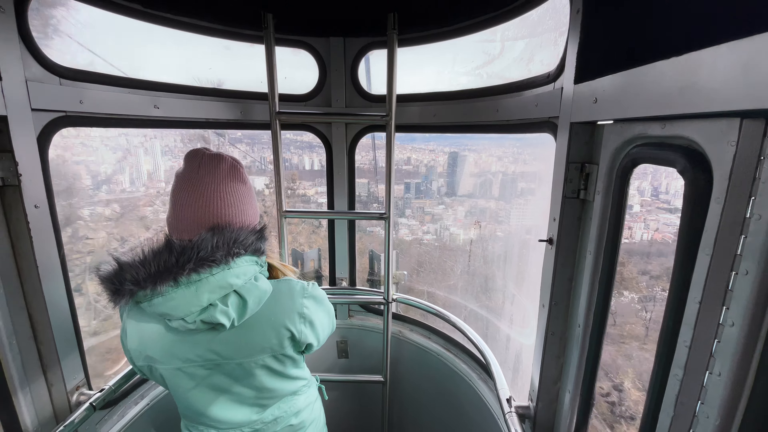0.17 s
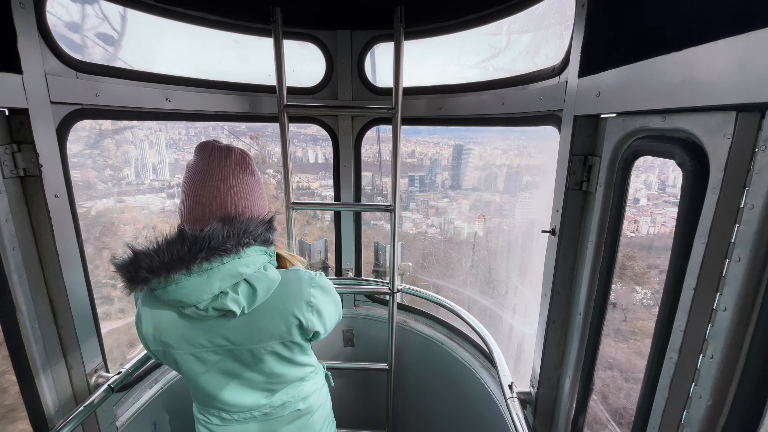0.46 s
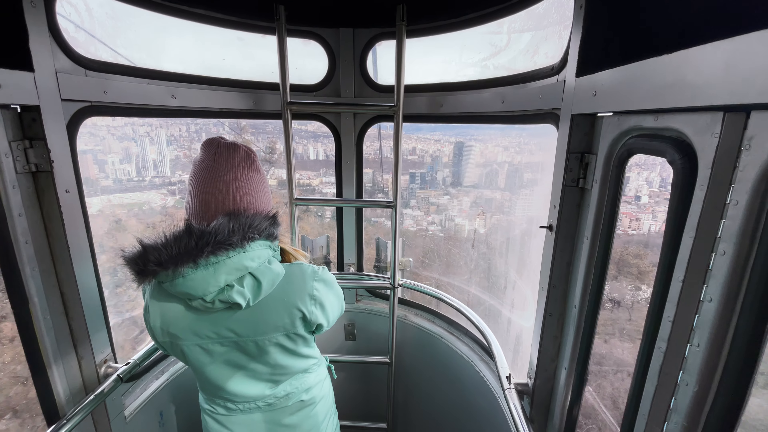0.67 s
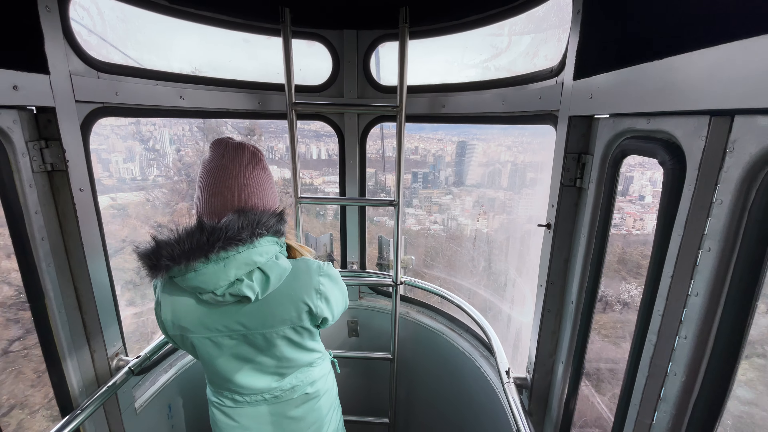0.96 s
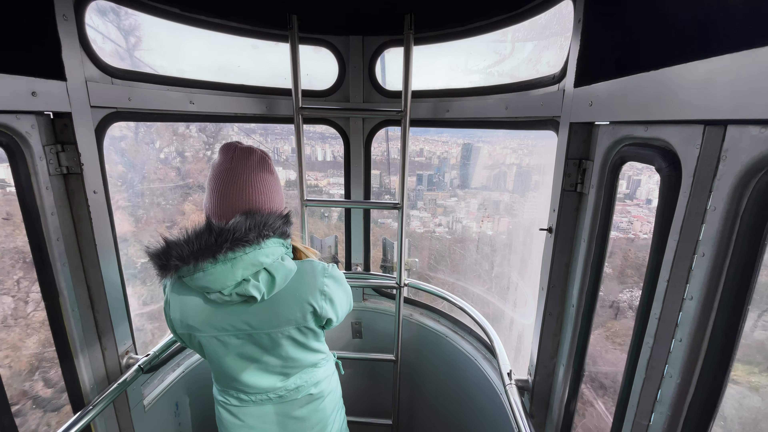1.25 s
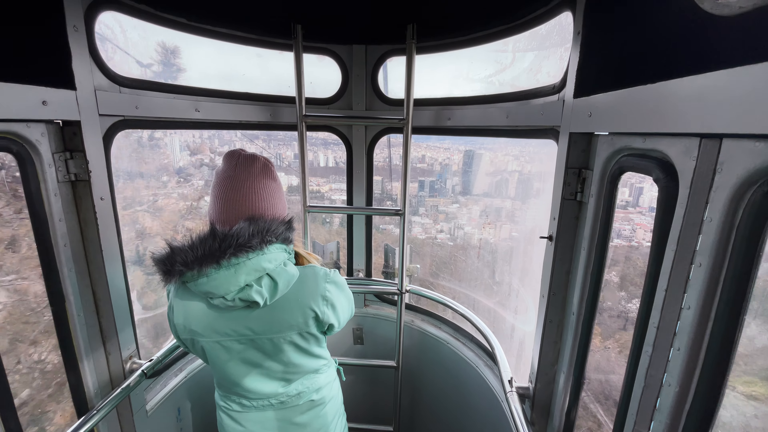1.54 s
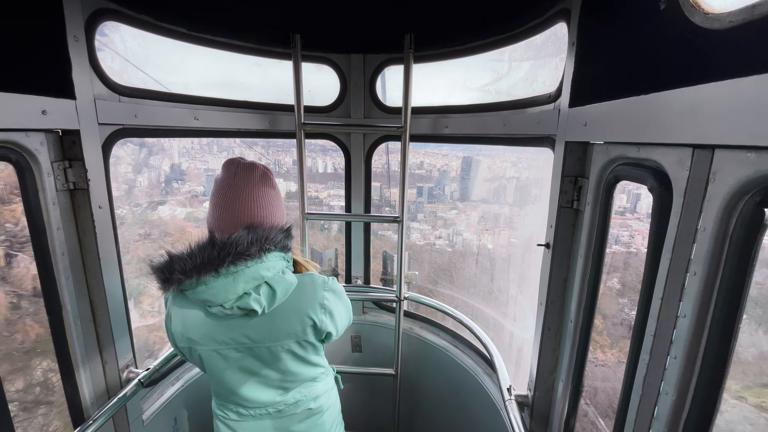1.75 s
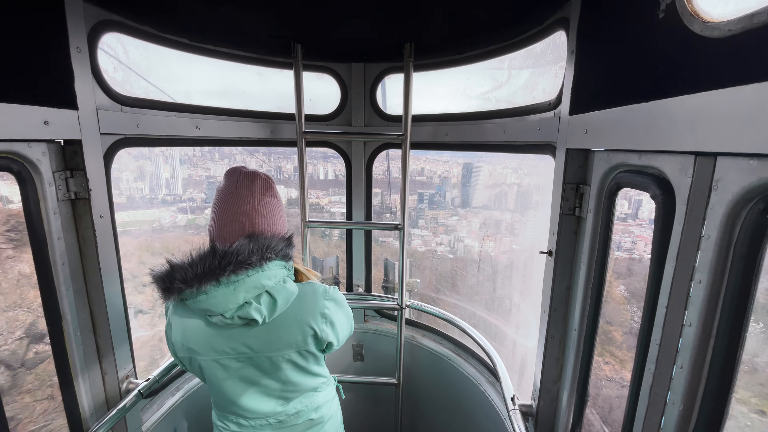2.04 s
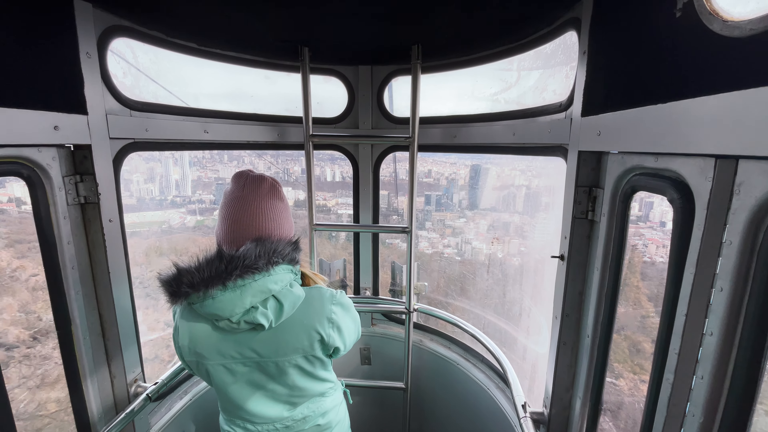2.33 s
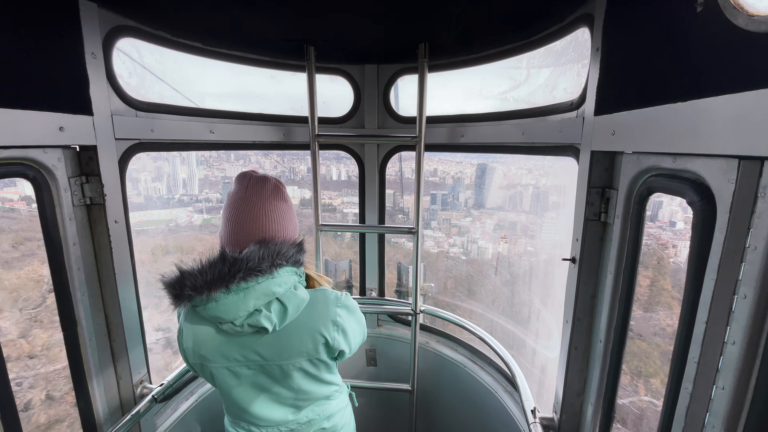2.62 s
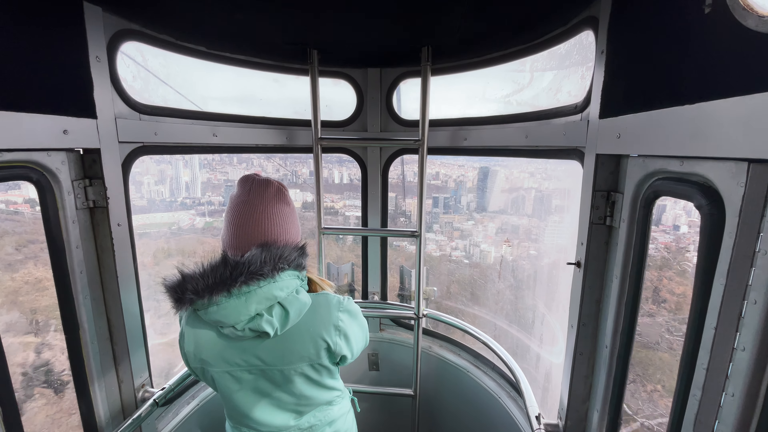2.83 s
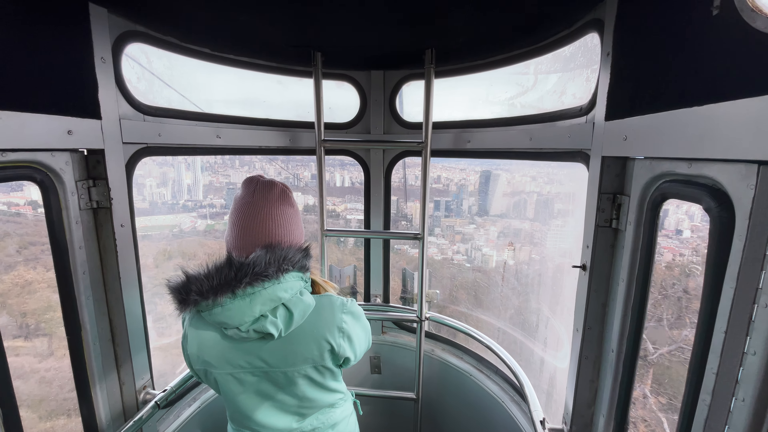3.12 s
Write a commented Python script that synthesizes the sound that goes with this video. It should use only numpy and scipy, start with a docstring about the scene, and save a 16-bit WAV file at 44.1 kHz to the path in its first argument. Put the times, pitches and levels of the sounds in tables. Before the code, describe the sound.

A low rumble swells and sinks throughout inside a small metal cable car as it travels along its rope. Light bumps shake the frame now and then, with faint rattling, rubbing and tiny pings over a soft wind.

```python
"""Inside a small metal cable car cabin gliding along its rope.
The shell booms near 80 Hz, the rope shakes the panels into a drone, and wind hisses past the windows.
Soft knocks come through the hanger (the arm that holds the cabin) and make the frame ring and shudder.
Loose frames rattle and parts rub; these sounds and the knocks echo briefly in the cabin.
A small fitting pings now and then."""
import sys
import numpy as np
from scipy import signal
from scipy.fft import rfft, irfft, next_fast_len
from scipy.io import wavfile
from scipy.ndimage import uniform_filter1d

SR = 44100
rng = np.random.default_rng(int(sys.argv[2]) if len(sys.argv) > 2 else 0)


def unload_audio(sound):
    """Save the sound as a 16-bit wav file, at the path given as the first command line argument."""
    columns = np.transpose(np.atleast_2d(sound))
    # keep every value between -1 and 1, then stretch to whole-number steps
    steps = np.round(np.clip(columns, -1, 1) * 32767)
    wavfile.write(sys.argv[1], SR, steps.astype(np.int16))


N = 145089

# soft knocks through the hanger: (time [s], level [dB], brightness [dB])
HANGER_KNOCKS = [(0.111, -41.5, -20), (0.194, -46.5, -3.5), (0.270, -54, -21.5), (0.341, -43.5, -27.5),
                 (0.515, -51.5, -13), (0.759, -37, -18), (0.951, -40.5, -14.5), (1.079, -36, -13),
                 (1.201, -45, -22.5), (1.363, -31.5, -14.5), (1.394, -36.5, -15), (1.437, -34, -18),
                 (1.461, -42.5, -19.5), (1.583, -36.5, -16.5), (2.006, -39.5, -9), (2.365, -39.5, -22),
                 (2.394, -38.5, -15), (2.45, -43.5, -25), (2.876, -33.5, -21), (3.1, -38, -18),
                 (3.221, -41.5, -23)]
KNOCK_RISE_S = .007


def shell_boom():
    """The metal shell booms: a deep tone that wavers and swells, with a rumble around the same pitch."""
    # swells of the tone: (time [s], level [dB])
    swells = [(.06, -24), (.12, -24), (.31, -18.5), (.45, -26.5), (.51, -16.5), (.59, -24), (.76, -15.5),
              (.92, -23.5), (1.03, -17.5), (1.08, -25.5), (1.26, -13), (1.31, -29), (1.35, -17),
              (1.48, -22.5), (1.57, -28.5), (1.61, -17.5), (1.74, -22.5), (1.81, -15), (1.92, -24),
              (2.09, -24), (2.18, -17.5), (2.24, -28), (2.33, -18), (2.48, -31), (2.54, -12), (2.59, -30.5),
              (2.66, -13.5), (2.75, -25.5), (2.82, -16), (2.89, -32), (2.96, -13.5), (3.0, -26.5),
              (3.13, -14.5), (3.21, -24.5), (3.28, -16)]
    boom_hz, wander, flutter_db = 79.66, .0724, 2
    swell_db = curve_in_time(swells)
    pitch_hz = boom_hz * (1 + wander * drift(10.27))
    tone = np.sqrt(2) * np.sin(2 * np.pi * np.cumsum(pitch_hz) / SR + 2 * np.pi * rng.random())
    boom = from_db(swell_db + flutter_db * drift(32)) * tone
    rumble = from_db(-27) * drone(boom_hz, width_hz=43)
    return stereo([boom, np.zeros(N)], boom_hz) + rumble


def panel_drone():
    """The rope shakes the panels, and they hum at their own pitches."""
    # panel hums: (pitch [Hz], width [Hz], level [dB])
    hums = [(143.25, 10, -33.5), (174.2, 30, -32.5), (201.1, 30, -38), (227.5, 22, -39), (281.4, 30, -45.5),
            (333.2, 14, -55), (584, 62, -53.5), (637.2, 62, -64.5), (740, 50, -65), (1580, 110, -74.5)]
    return sum(from_db(db) * drone(hz, width_hz) for hz, width_hz, db in hums)


def wind():
    """Wind and rolling noise: each half-octave band flickers, and the treble swells and sinks."""
    # tone colour of the noise: (frequency [Hz], relative level [dB per Hz])
    colour = [(24, -34), (45, -11.5), (70, -3.5), (120, -15.5), (216, -24.5), (376, -34.5), (490, -40.5),
              (893, -46), (2000, -62.5), (4480, -70.5), (6900, -80.5)]
    # the treble, as loose parts buzz more or less: (time [s], relative level [dB])
    treble = [(.06, -69), (.3, -72), (.58, -73), (.78, -68), (.93, -75), (1.5, -67), (1.75, -77),
              (1.98, -77), (2.05, -70), (2.2, -74), (2.75, -79), (2.98, -78), (3.28, -73)]
    level_db, flicker_db, treble_from_hz = -27, 2.5, 700
    treble_db = curve_in_time(treble)
    swing_db = treble_db - treble_db.mean()
    edges_hz = 20 * 2 ** np.arange(0, 9.1, .5)
    white = rng.standard_normal((2, 2, N + SR // 4))
    out = 0
    for k, (low, high) in enumerate(zip(edges_hz, edges_hz[1:])):
        band_filter = signal.butter(2, [low, high], "band", fs=SR, output="sos")
        band = signal.sosfilt(band_filter, white[k % 2])[:, -N:]
        hz = np.sqrt(low * high)
        treble_share = 1 / (1 + (treble_from_hz / hz) ** 2)
        band_db = curve_at_hz(colour, hz) + treble_share * swing_db + flicker_db * drift(19)
        out = out + from_db(band_db) * stereo(band, hz)
    return from_db(level_db) * rms_one(out)


def hanger_knocks():
    """Each knock through the hanger sets the frame ringing."""
    # the frame's own tones: (pitch [Hz], level [dB], time to fade by 60 dB [s])
    frame_tones = [(544, -12.5, 0.56), (595, -10.5, 0.067), (635.5, -2.5, 0.2), (780, -13, 0.21),
                   (1600, -4.5, 0.19)]
    return strike(HANGER_KNOCKS, frame_tones, KNOCK_RISE_S, spread_db=2)


def shudders():
    """The frame shakes for a moment after each knock: a broad, rough noise that dies away."""
    def envelope(t, fade_s, grain):
        return grain * np.minimum(t / KNOCK_RISE_S, 1) * from_db(-60 * t / fade_s)

    offset_db, centre_hz, fade_s = -3.5, 1250, .28
    events = [(s, db + bright_db + offset_db, centre_hz, fade_s) for s, db, bright_db in HANGER_KNOCKS]
    return bursts(events, envelope, octaves=1.5)


def rattles():
    """Loose frames give a thin tick, then a chatter of tiny touches that holds and dies away."""
    # rattles: (time [s], level [dB], centre pitch [Hz], time for the chatter to fade by 60 dB [s])
    events = [(.191, -57, 2690, 0.12), (.383, -60, 3150, 0.018), (.418, -55.5, 2200, 0.032),
              (.452, -52.5, 3360, 0.19), (.512, -53.5, 3270, 0.13), (.628, -55, 2370, 0.046),
              (.761, -62, 2980, 0.043), (.986, -56, 3150, 0.025), (1.489, -55.5, 2920, .05),
              (1.529, -60.5, 3470, .08), (2.029, -56.5, 2410, 0.09), (2.360, -63.5, 3530, 0.077),
              (2.402, -54.5, 3010, 0.031), (2.464, -64.5, 3110, 0.052), (2.635, -59, 2740, 0.083),
              (3.012, -56, 2000, 0.046)]
    tick_fade_s, rise_s, chatter_db, hold_share = .051, .003, -6, .14

    def tick(t, fade_s, grain):
        return from_db(-60 * t / tick_fade_s)

    def chatter(t, fade_s, grain):
        drop_db = 60 * np.maximum(t / fade_s - hold_share, 0)
        return grain * np.minimum(t / rise_s, 1) * from_db(chatter_db - drop_db)

    return bursts(events, tick, octaves=.4) + bursts(events, chatter, octaves=1.3)


def scuffs():
    """Parts rub together: a grainy noise that swells quickly and fades more slowly."""
    # rubs: (time [s], level [dB], centre pitch [Hz], length [s])
    rubs = [(.075, -61, 3600, .06), (.69, -70, 4000, .04), (1.055, -65, 3400, .06), (1.36, -64, 2500, .06),
            (1.555, -63, 4000, .04), (1.60, -65, 3000, .04), (2.09, -69, 3600, .07), (2.22, -70, 2800, .05),
            (2.285, -69, 3500, .05), (2.575, -71, 3500, .04), (2.83, -67, 2900, .035),
            (3.10, -67, 3400, .11), (3.05, -56, 1200, .18)]

    def envelope(t, length_s, grain):
        return grain * np.sin(np.pi * np.sqrt(np.minimum(t / length_s, 1)))

    return bursts(rubs, envelope, octaves=1.25)


def fitting_pings():
    """A small fitting rings faintly with two high tones."""
    # pings: (time [s], level [dB])
    pings = [(.703, -62), (.765, -66), (.826, -64), (1.082, -63), (1.58, -69), (2.107, -68), (2.22, -75),
             (2.30, -72), (3.10, -70), (3.16, -76)]
    # the fitting's own tones: (pitch [Hz], level [dB], time to fade by 60 dB [s])
    fitting_tones = [(4432, 0, .2), (6100, -10, .06)]
    return strike([(s, db, 0) for s, db in pings], fitting_tones, rise_s=.004, spread_db=1.5)


def cabin_echo(x, fade_s=.12):
    """Sound bounces between close metal walls: six repeating echoes for each ear."""
    size = next_fast_len(N + SR)
    radians_per_sample = 2 * np.pi * np.arange(size // 2 + 1) / size
    delays = (rng.uniform(.004, .013, (2, 6, 1)) * SR).astype(int)
    bounce = from_db(-60 * delays / SR / fade_s) * np.exp(-1j * radians_per_sample * delays)
    all_bounces = np.sum(bounce / (1 - bounce), axis=1)
    return irfft(rfft(x, size) * all_bounces, size)[:, :N] / np.sqrt(6)


def drone(hz, width_hz):
    """Random shaking, passed twice through one ringing tone, becomes a rough stereo hum."""
    fade_s = np.log(1000) / (np.pi * width_hz)
    shaking = rng.standard_normal((2, N + SR))
    hum = ring(ring(shaking, hz, fade_s), hz, fade_s)[:, SR:]  # skip the build-up
    return stereo(rms_one(hum), hz)


def strike(events, tones, rise_s, spread_db, bright_from_hz=900):
    """Each blow pushes every tone of a part into ringing, with a partly random strength."""
    out, rise = np.zeros((2, N + SR)), int(rise_s * SR)
    shape = (len(events), len(tones), 2)
    strengths = from_db(rng.normal(0, spread_db, shape)) * rng.choice([-1, 1], shape)
    for k, (hz, tone_db, fade_s) in enumerate(tones):
        push = np.hanning(rise) * np.cos(2 * np.pi * hz * np.arange(rise) / SR) * 4 / rise
        force = np.zeros((2, N + SR))
        for (s, db, bright_db), strength in zip(events, strengths[:, k]):
            start = int(s * SR)
            gain = from_db(db + tone_db + bright_db * (hz > bright_from_hz))
            force[:, start:start + rise] += gain * strength[:, None] * push
        out += stereo(ring(force, hz, fade_s), hz)
    return out[:, :N]


def bursts(events, envelope, octaves, touches_per_s=270, grain_db=1.6):
    """Short bands of noise; the envelope shapes their loudness and may add the grain of uneven touches."""
    out, t = np.zeros((2, N + SR)), np.arange(SR // 4) / SR
    noises = rng.standard_normal((len(events), 3, len(t)))
    for (s, db, hz, length_s), noise in zip(events, noises):
        touches = rms_one(uniform_filter1d(noise[2], int(SR / touches_per_s)))
        grain = rms_one(from_db(grain_db * touches))
        edges_hz = hz * 2 ** (np.array([-.5, .5]) * octaves)
        band_filter = signal.butter(3, edges_hz, "band", fs=SR, output="sos")
        burst = stereo(rms_one(signal.sosfilt(band_filter, noise[:2])), hz)
        start = int(s * SR)
        out[:, start:start + len(t)] += from_db(db) * burst * envelope(t, length_s, grain)
    return out[:, :N]


def ring(x, hz, fade_s):
    """Each click in x starts a tone that fades by 60 dB in fade_s seconds."""
    decay, step = from_db(-60 / (fade_s * SR)), 2 * np.pi * hz / SR
    return signal.lfilter([0, np.sin(step)], [1, -2 * decay * np.cos(step), decay * decay], x + 1e-18)


def stereo(pair, hz):
    """Mix two signals into left and right: the ears share the first and get the second with opposite signs."""
    # how alike the two ears sound: (frequency [Hz], likeness [0 to 1])
    likeness = [(80, 0.97), (170, 0.98), (350, 0.42), (700, 0.46), (1400, 0.0), (2800, 1), (5500, 0.67)]
    # balance between the ears: (frequency [Hz], left minus right [dB])
    balance = [(60, -.5), (200, -1.5), (700, 0.1)]
    alike, half_db = np.clip(curve_at_hz(likeness, hz), -1, 1), curve_at_hz(balance, hz) / 2
    shared = np.sqrt(1 + alike) * pair[0]
    opposite = np.sqrt(1 - alike) * pair[1] * [[1], [-1]]
    return (shared + opposite) * from_db([[half_db], [-half_db]]) / np.sqrt(2)


def drift(rate_hz):
    """A smooth random wobble of typical size 1, mostly slower than rate_hz."""
    hop, warm_up = 40, 2000
    memory = np.exp(-2 * np.pi * rate_hz * hop / SR)
    noise = rng.standard_normal(N // hop + warm_up + 2)
    slow = signal.lfilter([1], [1, -2 * memory, memory * memory], noise)[warm_up:]
    return np.interp(np.arange(N) / hop, np.arange(len(slow)), rms_one(slow))


def curve_in_time(points):
    """Join (time, value) points with straight lines, one value per sample."""
    times, values = np.transpose(points)
    return np.interp(np.arange(N) / SR, times, values)


def curve_at_hz(points, hz):
    """Read between (frequency, value) points, with octaves evenly spaced."""
    frequencies, values = np.transpose(points)
    return np.interp(np.log(hz), np.log(frequencies), values)


def from_db(db):
    """Turn decibels into a number to multiply by."""
    return 10 ** (np.asarray(db) / 20)


def rms_one(x):
    """Scale a signal so its average strength (rms) is 1."""
    return x / np.sqrt(np.mean(x ** 2) + 1e-20)


def scene():
    """All the sources together; only the clatter gets the cabin's echo."""
    clatter = rattles() + scuffs() + shudders() + hanger_knocks()
    pings = fitting_pings()
    return shell_boom() + panel_drone() + wind() + pings + clatter + from_db(-5.5) * cabin_echo(clatter)


def record(dry):
    """The microphone loses the deepest bass and top treble; the sound fades quickly in and out."""
    low_cut_hz, high_cut_hz, silence_s, fade_s = 32, 6800, .042, .0015
    t = np.arange(N) / SR
    fade = np.clip(np.minimum(t - silence_s, t[::-1]) / fade_s, 0, 1)
    low_cut = signal.butter(3, low_cut_hz, "high", fs=SR, output="sos")
    high_cut = signal.ellip(10, .5, 70, high_cut_hz, fs=SR, output="sos")
    return signal.sosfilt(high_cut, signal.sosfilt(low_cut, dry) * fade)


dry = scene()
out = record(dry)
unload_audio(out)
```